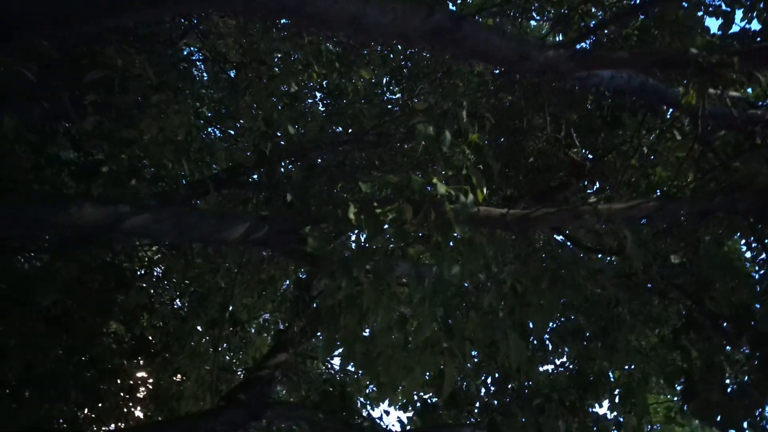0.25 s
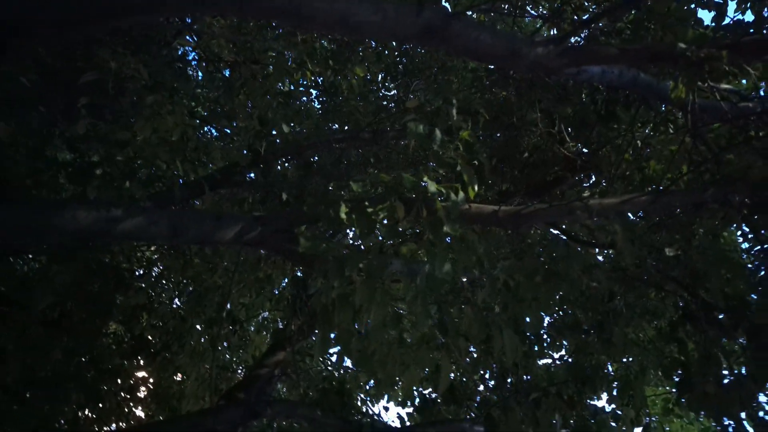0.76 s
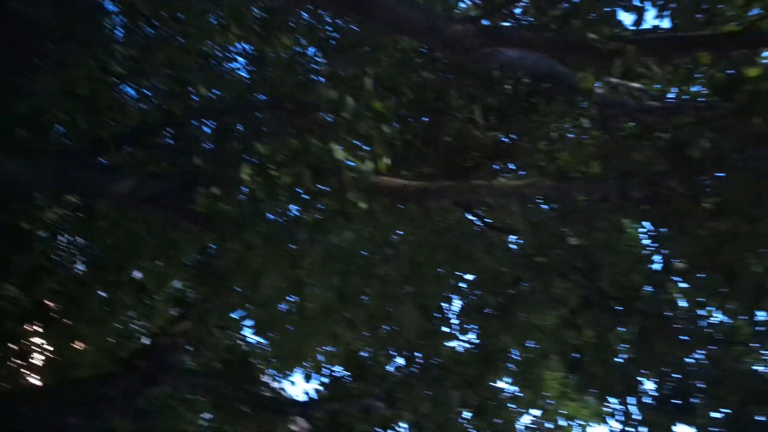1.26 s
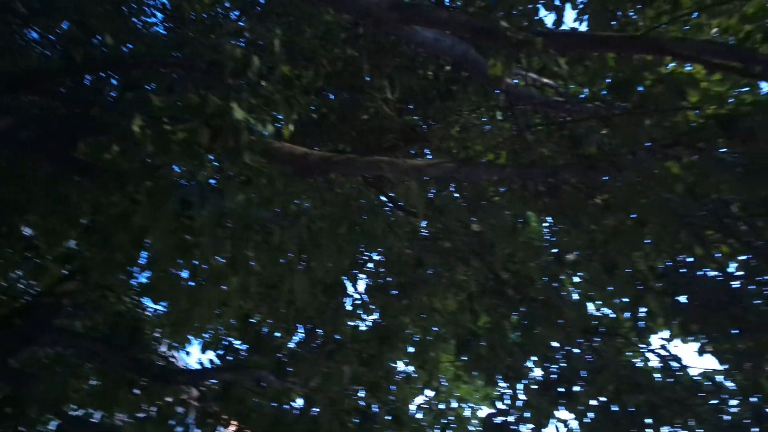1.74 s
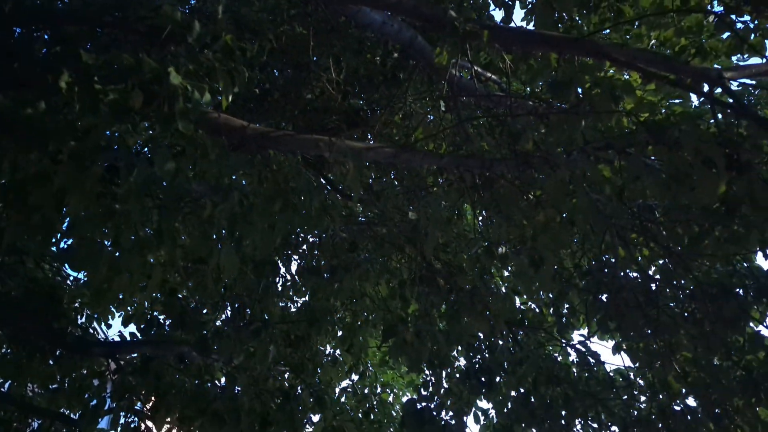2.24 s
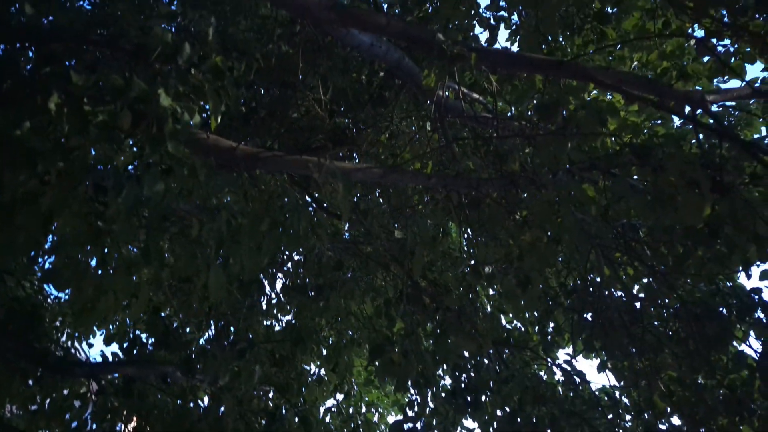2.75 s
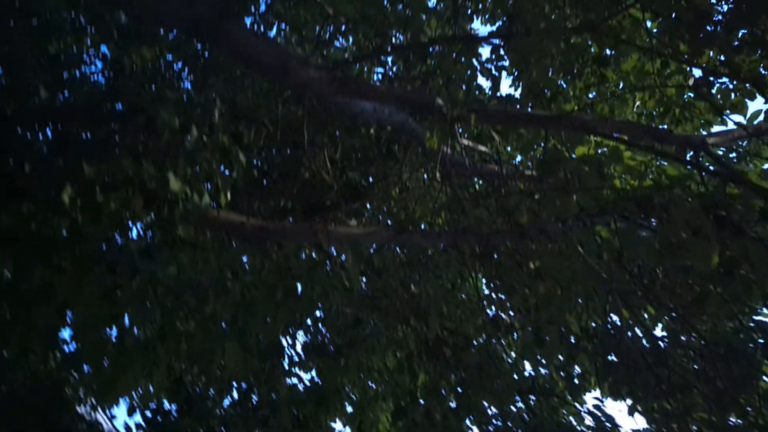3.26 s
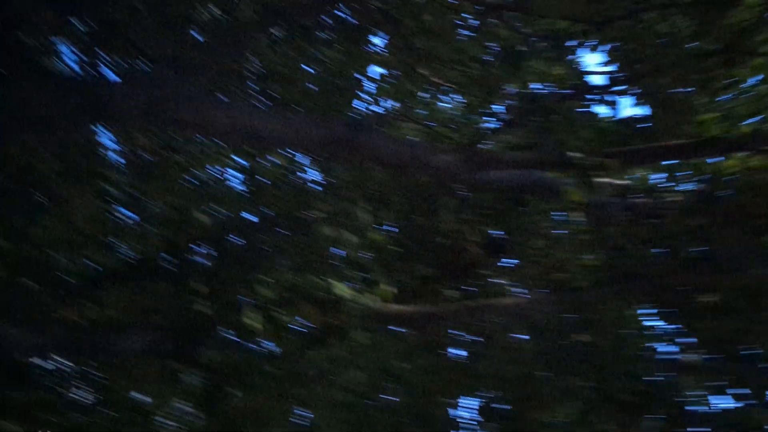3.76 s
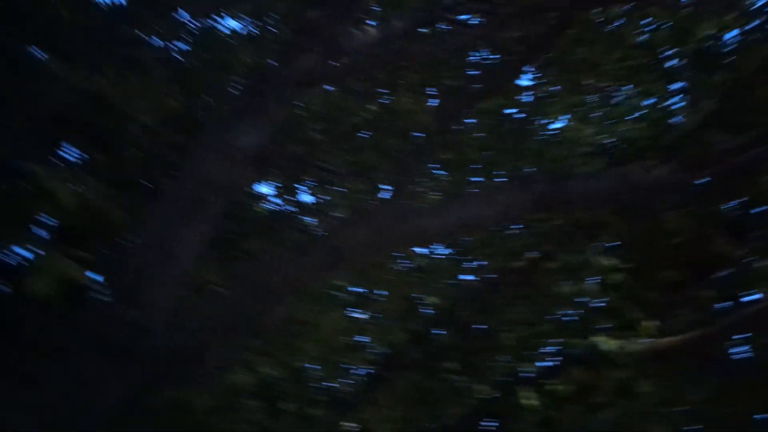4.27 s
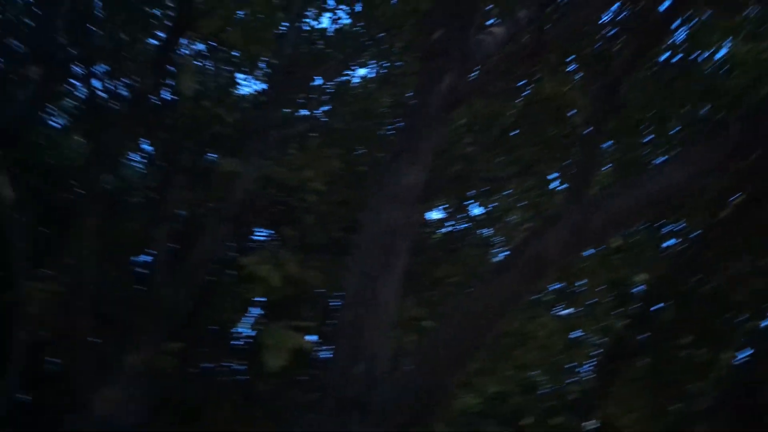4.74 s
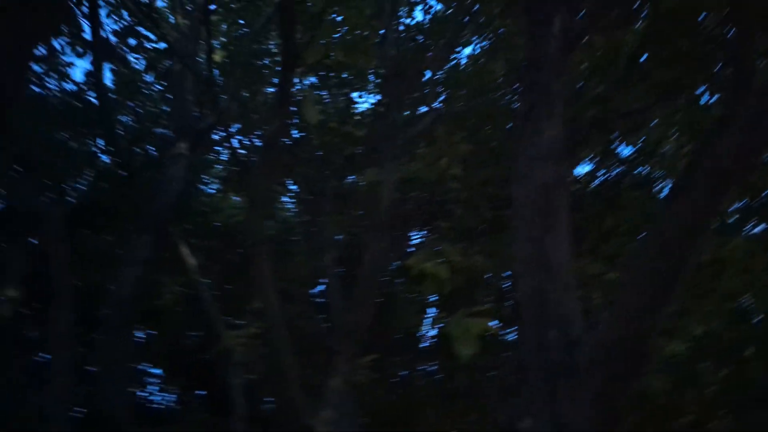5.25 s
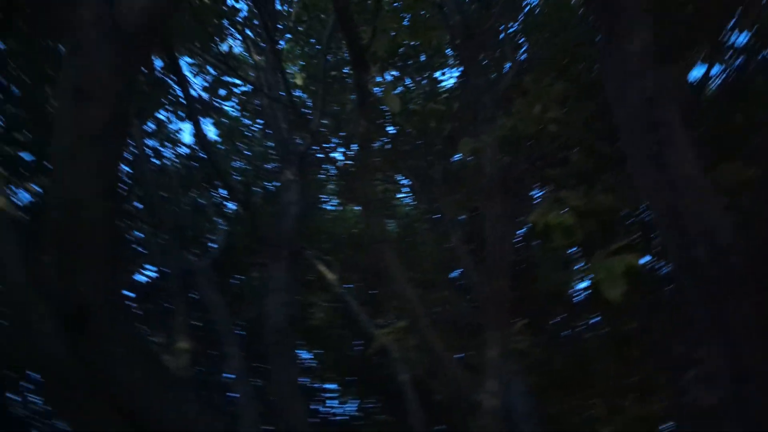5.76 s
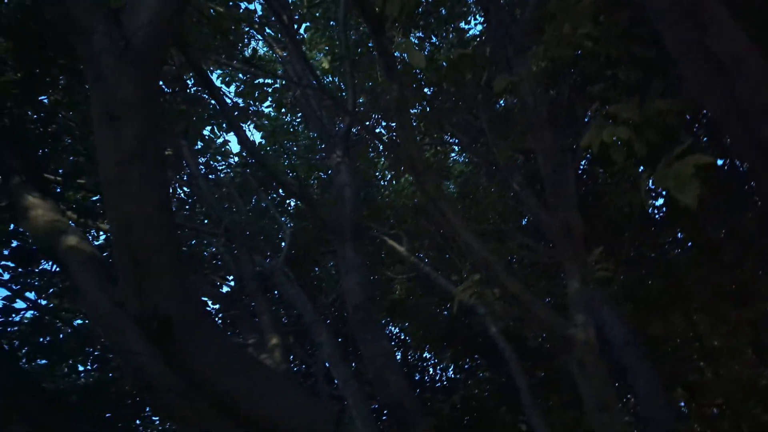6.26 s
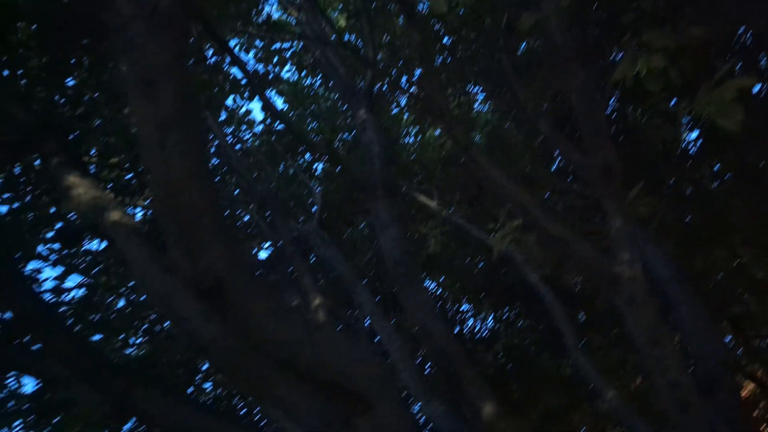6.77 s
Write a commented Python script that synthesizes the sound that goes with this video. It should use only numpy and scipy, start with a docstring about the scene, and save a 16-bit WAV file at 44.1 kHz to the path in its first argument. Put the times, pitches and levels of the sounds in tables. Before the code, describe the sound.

A flock of sparrows chatters nonstop in a leafy tree crown, sharp buzzy chirps overlapping, with low distant traffic rumbling softly behind.

```python
"""A flock of sparrows chatters in the crown of a big tree; trunks, branches and leaves scatter every chirp.
Each call is a gliding tone with overtones, shaken by a buzz; near birds stand out of a wash of farther ones.
Hard calls add bursts of rasping noise, and a twig ticks a few times in snaps of decaying noise.
Behind them distant traffic rumbles and hisses in shaped noise, one engine of wavering harmonics gathers
speed and eases off over a steady hum, and something whines faintly in thin tones that come and go."""
import sys
import numpy as np
from scipy import signal
from scipy.fft import rfft, irfft, next_fast_len
from scipy.io import wavfile
from scipy.ndimage import uniform_filter1d, map_coordinates

SR = 44100
rng = np.random.default_rng(int(sys.argv[2]) if len(sys.argv) > 2 else 0)


def put_to_file(sound):
    """Save the sound as 16-bit audio at rate SR, in the file named by the first command-line argument."""
    columns = np.atleast_2d(sound).T  # one column per channel
    safe = np.clip(columns, -1, 1)
    whole_steps = np.round(safe * 32767)
    wavfile.write(sys.argv[1], SR, whole_steps.astype(np.int16))


N = 309141

# Near calls, one table a kind; level_db and rasp_db are ahead of the layer trims.
# clear arches that break into a buzz: start_s, length_s, pitch_hz, level_db, left_minus_right_db, rasp_db
CHEEPS = [(0.17, 0.14, 3867, -23, 2.5, -45), (0.897, 0.15, 3594, -26.0, 3, -49),
          (1.906, 0.13, 3830, -26.5, 0.5, -44), (2.543, 0.13, 3880, -26.5, 0, -43),
          (3.177, 0.16, 3700, -25, -1, -42.5), (4.029, 0.16, 3940, -26.5, 0, -48),
          (4.597, 0.116, 4000, -25, 1.5, -42), (4.79, 0.13, 3827, -24.5, 1.5, -43),
          (5.301, 0.16, 3974, -24.5, -1.5, -46.5), (5.619, 0.11, 3545, -25.5, 11, -42),
          (6.115, 0.14, 3890, -28.5, 2, -44.5)]
# harsh, sinking calls: start_s, length_s, pitch_hz, level_db, left_minus_right_db, rasp_db
CHURRS = [(0.741, 0.11, 3590, -28.5, 3, -53), (1.528, 0.16, 3980, -30.5, -1.5, -47.5),
          (1.709, 0.16, 4137, -28, 1, -46.5), (2.745, 0.16, 3820, -29, -2, -48.5),
          (3.378, 0.149, 3580, -39, 0, -66), (3.507, 0.126, 3777, -33.5, 0.5, -55.5),
          (6.294, 0.16, 3940, -26, 2.5, -42), (6.752, 0.15, 3664, -30, 2, -51)]
# slightly hoarse zigzags: start_s, length_s, pitch_hz, level_db, left_minus_right_db, rasp_db
CHIRRUPS = [(0.007, 0.15, 4435, -30.0, -2, -46), (0.32, 0.16, 4810, -33, 3, -49),
            (0.495, 0.17, 4540, -29, 2, -48), (1.046, 0.13, 4685, -32.5, 1.5, -48),
            (1.218, 0.13, 4520, -33, 1.5, -51.5), (1.395, 0.13, 4413, -30.5, 4, -48),
            (2.03, 0.15, 4796, -35, -0.5, -65), (2.159, 0.16, 4510, -28.5, 3, -54),
            (2.443, 0.12, 4810, -28, -1, -48), (3.001, 0.14, 4720, -29.5, 2, -47.5),
            (3.843, 0.159, 4880, -26, 3, -52), (4.254, 0.14, 4654, -31.5, 1, -50.5),
            (4.996, 0.13, 4600, -30.5, 5.5, -50.5), (5.993, 0.16, 4930, -33, -3.5, -48),
            (6.462, 0.13, 4740, -28.5, -2, -57)]
# level, buzzy notes, mostly high: start_s, length_s, pitch_hz, level_db, left_minus_right_db, rasp_db
CHIPS = [(0.485, 0.093, 5080, -39, 0.5, -60), (0.489, 0.1, 6580, -46, 1, -52),
         (0.886, 0.042, 5370, -37, 2.5, -45), (0.992, 0.065, 6300, -39, 4, -51.5),
         (1.375, 0.1, 5310, -39.5, 1, -52), (1.782, 0.046, 5460, -33.5, -1.5, -45.5),
         (1.913, 0.016, 4286, -26, 0, -56), (2.13, 0.093, 5130, -36.5, 1, -54),
         (2.408, 0.047, 6190, -39.5, 1, -63), (2.73, 0.11, 5100, -45, -2, -62),
         (3.048, 0.058, 5100, -35.5, 0, -48), (3.132, 0.075, 5690, -42.5, -2, -59),
         (3.204, 0.0223, 3760, -21.5, 1, -56), (3.513, 0.041, 5170, -42, 1, -66),
         (3.921, 0.12, 4870, -46.5, 1, -47.5), (4.115, 0.09, 5180, -37, -0.5, -44.5),
         (4.333, 0.12, 6080, -43, 1.5, -47.5), (4.403, 0.062, 5390, -38.5, -1, -55),
         (4.461, 0.107, 6470, -49, 0.5, -54), (4.542, 0.085, 6300, -44.5, 0, -56),
         (5.184, 0.057, 4670, -38.5, 2.5, -59), (5.4, 0.09, 5330, -39, -1, -47.5),
         (5.56, 0.057, 5320, -39.5, -2.5, -46), (5.913, 0.052, 4420, -33, -1.5, -56),
         (6.391, 0.12, 5130, -38, -1, -44.5), (6.751, 0.038, 6190, -39.5, -4, -51),
         (6.785, 0.059, 4484, -31.5, -0.5, -62.5), (6.99, 0.057, 5500, -41, 1.5, -55.5)]
# short notes that dip and rise: start_s, length_s, pitch_hz, level_db, left_minus_right_db
SLURS = [(0.003, 0.067, 3203, -26.0, 2.5), (0.663, 0.062, 3030, -29, 2), (1.105, 0.083, 2960, -30, 0),
         (1.345, 0.064, 3490, -33.5, 4.5), (2.709, 0.087, 3293, -31.5, 0), (2.896, 0.079, 3370, -32.5, -2),
         (3.1, 0.073, 3050, -29.5, 0.5), (3.808, 0.055, 3710, -37, 0), (4.19, 0.068, 3440, -30.5, 4),
         (4.748, 0.056, 3510, -28, 1), (5.224, 0.075, 3455, -30.5, 1.5), (5.482, 0.071, 3454, -30, 2),
         (5.789, 0.075, 3205, -36, 3), (5.925, 0.066, 3270, -36.0, 1.5)]


def from_db(db):
    """Amplitude gain of a level in dB."""
    return 10 ** (np.asarray(db) / 20)


def rms_one(x):
    """Scale a sound to rms 1."""
    return x / np.sqrt(np.mean(x ** 2) + 1e-20)


def steady(x):
    """Level evened out to rms 1 over about a tenth of a second."""
    return x / np.sqrt(uniform_filter1d(np.mean(x ** 2, axis=0), size=4000) + 1e-9)


def in_time(rows):
    """Each column of a curve over time, joined by straight lines."""
    s, *columns = np.transpose(rows)
    return [np.interp(np.arange(N) / SR, s, c) for c in columns]


def at_hz(points, hz):
    """Read a curve over frequency, straight on a logarithmic axis."""
    points_hz, values = np.transpose(points)
    return np.interp(np.log(hz), np.log(points_hz), values)


def add(out, sound, s):
    """Mix a sound in from time s on."""
    start = int(np.clip(s * SR, 0, N))
    out[..., start:start + sound.shape[-1]] += sound[..., :N - start]


def swells(rows):
    """Summed power of smooth swells, given as (start s, length s, peak dB)."""
    power = np.zeros(N)
    for s, length, db in rows:
        hump = from_db(db) ** 2 * np.hanning(int(length * SR))
        already_past = int(max(-s, 0) * SR)   # a swell may begin before time zero
        add(power, hump[already_past:], s)
    return power


def drift(rate):
    """Slow chance: noise twice through a one-pole low-pass at a rate in Hz; spread 1."""
    step = 40   # samples between the slow points
    r = np.exp(-2 * np.pi * rate * step / SR)
    slow = signal.lfilter([1], [1, -2 * r, r * r], rng.standard_normal(N // step + 2002))
    slow = slow[2000:]   # drop the filter's start-up
    return np.interp(np.arange(N) / step, np.arange(len(slow)), rms_one(slow))


def banded_noise(spectrum, patchy_db):
    """Third-octave bands of stereo noise, each with its own level, flicker and likeness; rms 1."""
    # left-right likeness of the noise: band_hz, correlation (-1 to 1)
    likeness = [(50, 0.99), (125, 0.97), (250, 0.89), (500, 0.7), (1000, -0.45), (2500, 0.24),
                (15000, -0.1)]
    edges = 25 * 2 ** (np.arange(29) / 3)
    out = 0
    white = rng.standard_normal((2, 2, N))
    for k, (low, high) in enumerate(zip(edges, edges[1:])):
        if high < spectrum[0][0] or low > spectrum[-1][0]:
            continue
        band = signal.butter(2, [low, high], "band", fs=SR, output="sos")
        mid, side = signal.sosfilt(band, white[k % 2])   # neighbouring bands use different noise
        hz = np.sqrt(low * high)
        alike = at_hz(likeness, hz)
        gain = from_db(at_hz(spectrum, hz) + patchy_db * drift(6.0))
        out = out + gain * (np.sqrt(1 + alike) * mid + np.sqrt(1 - alike) * side * [[1], [-1]])
    return rms_one(out)


def far_tone(hz, waver_db=2.0, wander=0.0032):
    """A tone from afar, wavering in level and pitch on its way through the air; rms 1."""
    phase = 2 * np.pi * np.cumsum(hz * (1 + wander * drift(2.58))) / SR
    return rms_one(np.sin(phase) * from_db(waver_db * drift(2.0)))


def rumble_and_road():
    """Traffic as two shaped noises: a low rumble and the hiss of tyres."""
    # course of the traffic ahead of the trims below: time_s, rumble_db, road_hiss_db
    course = [(0.0, -38.5, -47.5), (2.83, -37, -47), (6.15, -37, -47), (7.01, -37, -46.5)]
    # relative rumble spectrum: band_hz, density_db (per Hz)
    rumble_spectrum = [(15, -43), (25, -17), (44, -2), (65, -2), (91, -3.5), (139, -6), (167, -9.5),
                       (247, -11), (330, -26), (430, -36), (730, -120)]
    # relative tyre hiss spectrum: band_hz, density_db (per Hz)
    road_spectrum = [(200, -36), (300, -4), (500, -1.5), (800, -1.5), (950, 1.5), (1300, -2.5),
                     (2200, -6.5), (4000, -4.5), (8000, -35.5), (15000, -74)]
    rumble_db, road_db = in_time(course)
    low_cut = signal.butter(6, 42, "high", fs=SR, output="sos")
    rumble = rms_one(signal.sosfilt(low_cut, banded_noise(rumble_spectrum, patchy_db=1.0)))
    road = banded_noise(road_spectrum, patchy_db=1.3)
    return from_db(rumble_db - 1.5) * rumble + from_db(road_db + 3.0) * road


def engine():
    """A distant engine speeding up and easing off: harmonics of its firing rate, each wavering alone."""
    # course of the engine ahead of a 1 dB cut: time_s, firing_rate_hz, level_db
    course = [(0, 56.54, -49), (1.5, 58.4, -45.5), (2.7, 58.9, -42.5), (4, 65.3, -40.5), (5.5, 67, -39.5),
              (6.1, 65, -42.5), (7.01, 56.26, -48)]
    # harmonics of the firing rate: multiple, relative_level_db
    orders = [(1, 0.5), (2, -10), (3, -14.5), (4, -13.5)]
    firing_hz, engine_db = in_time(course)
    harmonics = sum(from_db(db) * far_tone(multiple * firing_hz) for multiple, db in orders)
    return from_db(engine_db - 1.0) * harmonics


def traffic():
    """Rumble and tyre hiss, one engine changing speed and a steady low hum."""
    hum_hz, hum_db = 136.8, -48.5
    return rumble_and_road() + engine() + from_db(hum_db) * far_tone(hum_hz)


def whine():
    """A thin, wavering tone that comes and goes."""
    # whines: start_s, length_s, pitch_hz, level_db
    whine_rows = [(0.0, 0.94, 929, -60.5), (1.851, 0.62, 928, -61.5), (3.42, 0.44, 916, -55.5),
                  (3.76, .22, 811.5, -57), (6.121, 0.27, 911, -57), (6.532, 0.46, 906, -52.5)]
    out = np.zeros(N)
    for s, length, hz, db in whine_rows:
        swell = signal.windows.tukey(int(length * SR), .4)
        add(out, from_db(db) * swell * far_tone(hz)[:len(swell)], s)
    return out


def crown(x, first_s=0.002, bough_db=4, t60_s=0.28):
    """Scattering in the tree: dense echoes, a few stronger ones off the boughs, dying away."""
    t = np.arange(SR) / SR
    echoes = rng.standard_normal((2, SR)) * from_db(bough_db * rng.standard_normal((2, SR)))
    echoes = echoes * from_db(-60 * t / t60_s) * (1 - np.exp(-t / first_s))
    echoes /= np.sqrt(np.sum(echoes ** 2, axis=1, keepdims=True))
    return signal.fftconvolve(x, echoes, axes=1)[:, :N]


def panned(pan_db):
    """Left and right gains of constant power."""
    return rms_one(from_db(np.array([[pan_db], [-pan_db]]) / 2))


def at_perch(sound, pan_db, lag_per_db=2.5):
    """The nearer microphone hears a bird louder and some samples earlier."""
    lag = int(round(np.clip(lag_per_db * pan_db, -24, 24)))   # samples
    padded = np.pad(sound, abs(lag))
    return panned(pan_db) * np.array([padded, np.roll(padded, lag)])


def chirp(length, pitch_hz, shape, chance, hoarse=.14):
    """The syrinx glides through a call's shape with a slight warble; a fast buzz shakes pitch and level."""
    # overtones of a chirp: multiple, relative_level_db
    partials = [(1, 0), (2, -30), (3, -30), (4, -35)]
    buzz_hz, buzz_swing_hz, buzz_flutter = 330, 290, .66
    warble_hz, warble_swing_hz = 60, 65
    fade_s = 0.0054
    u = np.linspace(0, 1, int(length * SR))
    share, *columns = np.transpose(shape)
    ratio, level_db, rough = (uniform_filter1d(np.interp(u, share, c), size=300, mode="nearest")
                              for c in columns)
    # smooth curves through random points, two points a cycle; the warble reads the first row backwards
    shake, throb = (map_coordinates(row, [u * length * 2 * buzz_hz], mode="mirror") for row in chance)
    warble = map_coordinates(chance[0][::-1], [u * length * 2 * warble_hz], mode="mirror")
    buzz = np.hypot(rough, hoarse)   # even the clear notes are a little hoarse
    glide_hz = pitch_hz * ratio
    phase = 2 * np.pi * np.cumsum(glide_hz + warble_swing_hz * warble + buzz * buzz_swing_hz * shake) / SR
    tone = sum(from_db(db) * np.sin(k * phase) * (k * glide_hz < SR / 2) for k, db in partials)
    swell = signal.windows.tukey(len(u), 2 * fade_s / length) * from_db(level_db)
    return swell * rms_one(tone * np.exp(buzz * buzz_flutter * throb))


def far_birds(count=340, centre_hz=3700, spread=0.11, bend=.105, rough=0.34):
    """Many short chirps at random times and pitches, from deeper in the tree."""
    out = np.zeros((2, N))
    for k in range(count):
        ratios = np.exp(spread * rng.uniform(-1.5, 1.5) + bend * rng.uniform(-2.0, 2.0, size=4))
        shape = [(share, ratio, 0, rough) for share, ratio in zip(np.linspace(0, 1, len(ratios)), ratios)]
        call = chirp(rng.uniform(.03, 0.072), centre_hz, shape, rng.standard_normal(size=(2, 128)))
        start_s = (k + rng.uniform(-1.1, 1)) / count * N / SR
        add(out, at_perch(call, rng.normal(0, 5)), start_s)
    return out + crown(out)


def chatter(flock):
    """The birds set one another off: the far flock swells around the longer, lower near calls."""
    far_db, floor_db = -7.5, -79   # trim of the layer; what the flock keeps up between calls, ahead of it
    lead_s, lag_s = 0.067, 0.072   # far birds start before a near call and stop after it
    leaders = [*CHEEPS, *CHURRS, *CHIRRUPS, *SLURS]
    power = swells([(s - lead_s, lead_s + length + lag_s, db) for s, length, _, db, *_ in leaders])
    return from_db(far_db) * np.sqrt(power + from_db(floor_db) ** 2) * steady(flock)


def rasp(flock):
    """Hard calls open the beak: overtones and a rattling hiss burst out and linger in the leaves."""
    # relative hiss spectrum: band_hz, density_db (per Hz)
    hiss_spectrum = [(5000, -2.5), (6300, -12), (7300, -23.5), (8600, -19), (9900, -35), (11800, -17.5),
                     (14500, -34), (15600, -30)]
    lead_s, burst_s = 0.047, 0.14   # the burst starts ahead of its call
    linger_s, linger_share = 0.048, 0.45
    rattle_hz, rattle_db = 160, 1.2
    hiss_db, overtones_db, floor_db = 6.5, -4, -74.5   # the floor stays between calls
    hard_calls = [*CHEEPS, *CHURRS, *CHIRRUPS, *CHIPS]
    burst = swells([(s - lead_s, burst_s, db) for s, *_, db in hard_calls])
    direct = burst * rms_one(from_db(rattle_db * drift(rattle_hz))) ** 2
    keep = np.exp(-1 / (linger_s * SR))
    lingering = signal.lfilter([1 - keep], [1, -keep], burst)
    power = (1 - linger_share) * direct + linger_share * lingering
    high_pass = signal.butter(8, 7500, "high", fs=SR, output="sos")
    overtones = steady(signal.sosfilt(high_pass, flock))
    hiss = banded_noise(hiss_spectrum, patchy_db=2.5)
    grain = from_db(overtones_db) * overtones + from_db(hiss_db) * hiss
    return np.sqrt(power + from_db(floor_db) ** 2) * grain


def twig():
    """Dry snaps a few milliseconds long: decaying noise with a softened top."""
    # twig ticks: start_s, level_db (onset of the noise, ahead of the low-pass and the near trim)
    tick_rows = [(4.8955, -24), (5.682, -12), (5.9965, -36)]
    out = np.zeros((2, N))
    t = np.arange(SR // 20) / SR
    decay = np.exp(-t / .001)
    for s, db in tick_rows:
        add(out, from_db(db) * rng.standard_normal((2, len(t))) * decay, s)
    return signal.sosfilt(signal.butter(2, 8000, fs=SR, output="sos"), out)


def calls(rows, shape):
    """Calls of one kind, each stretched to its length and pitch and sent from its own perch."""
    out = np.zeros((2, N))
    chances = rng.standard_normal((len(rows), 2, 128))
    for (s, length, pitch_hz, db, pan_db, *_), chance in zip(rows, chances):
        call = chirp(length, pitch_hz, shape, chance)
        add(out, from_db(db) * at_perch(call, pan_db), s)
    return out


def near_birds():
    """Every kind of call from the nearest branches, each kind with its own contour of the voice."""
    # cheep, a clear arch that breaks into a buzz and falls away:
    # share_of_length, pitch_ratio, level_db, roughness (0-1)
    cheep_shape = [(0, .93, -17, 0.2), (0.101, 1.13, -2, 0.16), (0.201, 1.12, -2.5, 0.22),
                   (.3, .99, 0.5, 0.52), (0.499, .96, -0.5, 0.79), (.62, .83, -6, 0.59),
                   (.78, .84, -3, 0.31), (1, .71, -10, 0.33)]
    # churr, harsh and sinking: share_of_length, pitch_ratio, level_db, roughness (0-1)
    churr_shape = [(0, 1.04, -9, .9), (.25, 1.06, -2.5, .9), (0.601, 0.85, -1, 0.896),
                   (.8, .86, -0.5, 0.58), (1, 0.7, -5.5, .4)]
    # chirrup, a zigzag of two peaks: share_of_length, pitch_ratio, level_db, roughness (0-1)
    chirrup_shape = [(0, .7, -5.5, .3), (.14, 0.94, -4.5, 0.29), (.26, .98, -2, .35), (.42, .74, -1, 0.346),
                     (.53, .65, -2.5, 0.36), (0.751, .88, -4, 0.29), (.88, .7, -2.5, 0.32),
                     (1, .62, -17.5, 0.27)]
    # slur, a dip and a rise: share_of_length, pitch_ratio, level_db, roughness (0-1)
    slur_shape = [(0, 1.08, -2, 0.22), (.3, .95, -7, .15), (0.601, 1.06, -4.5, 0.17), (1, 1.28, -1, 0.17)]
    # chip, level and buzzy: share_of_length, pitch_ratio, level_db, roughness (0-1)
    chip_shape = [(0, .96, -4, .5), (.3, 0.98, 3.5, 0.53), (.7, .99, 1, 0.63), (1, .98, -2.5, 0.53)]
    # flick, a quick downstroke: share_of_length, pitch_ratio, level_db, roughness (0-1)
    flick_shape = [(0, 0.85, -5, .25), (0.252, 1, -0.5, 0.3), (0.652, .82, -1, .3), (1, .73, -6, .25)]
    # flicks, ahead of the near trim: start_s, length_s, pitch_hz, level_db, left_minus_right_db
    flick_rows = [(0.289, 0.063, 3970, -33.5, 1), (0.369, 0.041, 4680, -27.5, -2),
                  (0.415, 0.041, 3860, -36, 1), (1.045, 0.04, 4750, -25, 2.5), (1.151, 0.064, 4140, -33, 1),
                  (1.195, 0.058, 3910, -33.5, 1), (1.504, 0.037, 4530, -32.5, 1),
                  (1.55, 0.035, 3800, -31.5, 1), (1.997, 0.034, 3740, -33.0, -1),
                  (2.049, 0.077, 3850, -30, 3.5), (2.496, 0.066, 3880, -28.5, -1.5),
                  (3.363, 0.056, 3980, -33.5, 1.5), (3.483, 0.047, 4630, -41, 1),
                  (3.927, 0.061, 3930, -30.5, 1.5), (4.438, 0.024, 4220, -32, 2.5),
                  (4.919, 0.057, 3740, -36.5, 1), (5.094, 0.032, 3450, -31.5, 1),
                  (5.587, 0.055, 4230, -23.5, 3), (5.985, 0.035, 3620, -35, 1),
                  (6.055, 0.074, 4100, -33, 0.5), (6.194, 0.048, 3850, -26.5, 3),
                  (6.762, 0.069, 3920, -29.5, 3)]
    kinds = [(CHEEPS, cheep_shape), (CHURRS, churr_shape), (CHIRRUPS, chirrup_shape),
             (SLURS, slur_shape), (CHIPS, chip_shape), (flick_rows, flick_shape)]
    return sum(calls(rows, shape) for rows, shape in kinds)


def scene():
    """Birds and twig in the scattering crown, traffic and whine behind."""
    near_db, scatter_db = -1.5, -3   # direct sound and its echoes in the tree
    near = near_birds() + twig()
    flock = far_birds()
    close = from_db(near_db) * near + from_db(scatter_db) * crown(near)
    return traffic() + whine() + chatter(flock) + rasp(flock) + close


def record(dry):
    """The two microphone ports colour the sound differently; the top is cut steeply."""
    # balance of the two ports: band_hz, left_minus_right_db
    ports = [(300, 0.1), (1000, 0.5), (2300, 3.5), (3000, 3), (3500, 3.5), (4000, -1.5), (4600, -1.5),
             (5400, -5), (6400, 0.2), (8000, -0.5), (9500, 1.5), (12000, -4), (15000, -0.3)]
    size = next_fast_len(N + SR)
    lean_db = at_hz(ports, np.maximum(np.fft.rfftfreq(size, 1 / SR), 1))
    colour = from_db(np.array([lean_db, -lean_db]) / 2)
    heard = irfft(rfft(dry, size) * colour, size)[:, :N]
    top_cut = signal.ellip(12, .2, 80, 15750, fs=SR, output="sos")
    return signal.sosfilt(top_cut, heard)


dry = scene()
out = record(dry)
put_to_file(out)
```